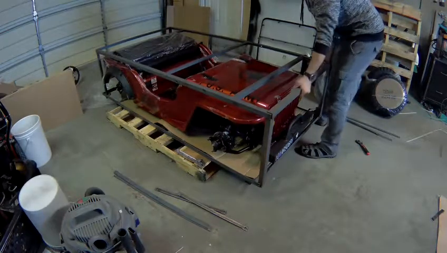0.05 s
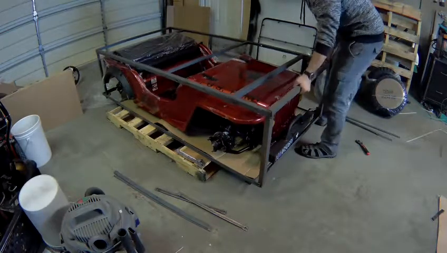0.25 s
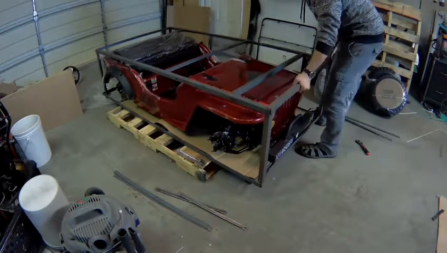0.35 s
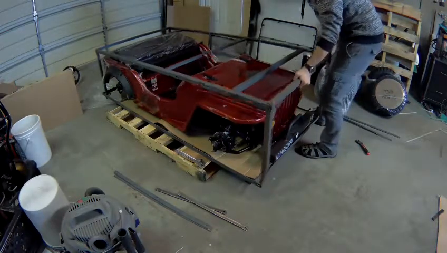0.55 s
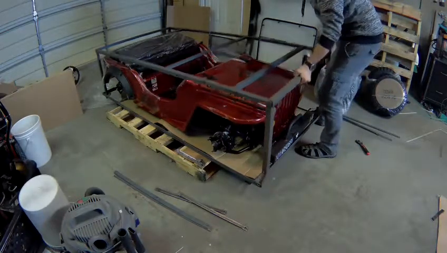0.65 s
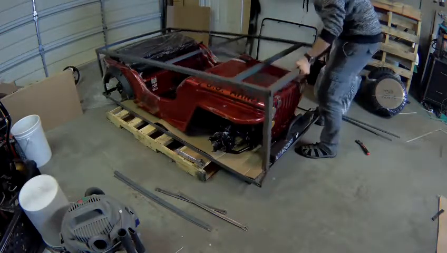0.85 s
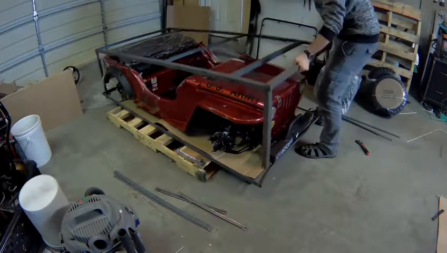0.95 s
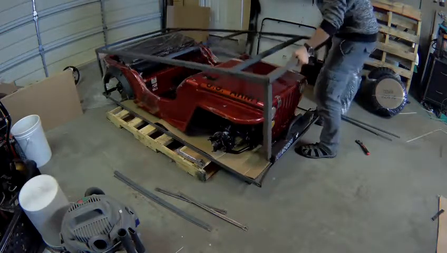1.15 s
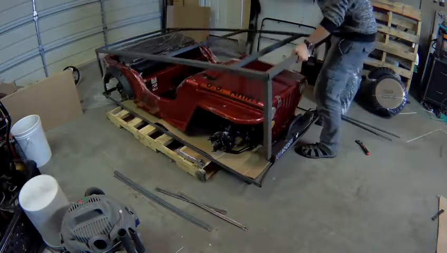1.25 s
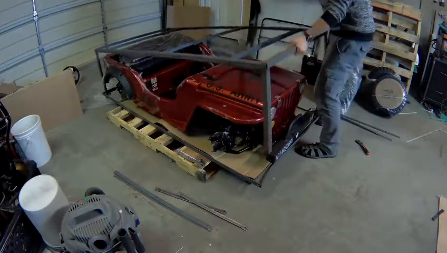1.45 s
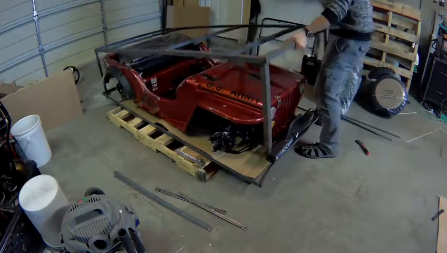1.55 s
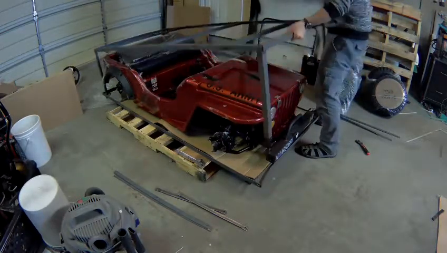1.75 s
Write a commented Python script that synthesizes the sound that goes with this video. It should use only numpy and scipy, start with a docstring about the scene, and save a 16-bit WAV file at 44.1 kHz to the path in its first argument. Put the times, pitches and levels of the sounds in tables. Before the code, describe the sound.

A steel tube frame scrapes over a small vehicle body, slips free with a bright clank, then scrapes again. Two hollow knocks follow, each ringing briefly in a quiet workshop, over a faint rustle of sleeves.

```python
"""In a quiet, hard-walled workshop, a welded steel tube frame is worked loose and lifted off a small
vehicle body. Stick-slip friction drives shell, panels and tubes in two scrapes. Between them the frame
slips free with a bright clank; a tiny tick follows. Two knocks then excite the low modes of the hollow
body. Every contact rings on in metal and room, over a faint rustle of sleeves."""
import sys
import numpy as np
from scipy import signal
from scipy.fft import rfft, irfft
from scipy.io import wavfile

SR = 44100
rng = np.random.default_rng(int(sys.argv[2]) if len(sys.argv) > 2 else 0)


def unload_wav(signal):
    """Save mono or channel-first audio to the path in sys.argv[1] as 16-bit WAV at rate SR, clipped to [-1, 1]."""
    wavfile.write(
        sys.argv[1],
        SR,
        np.round(np.clip(np.atleast_2d(signal).T, -1, 1) * 32767).astype(np.int16),
    )


N = 79380
T = np.arange(N) / SR
HZ = np.maximum(np.fft.rfftfreq(N, 1 / SR), 1)

# Spectra. Each row: frequency in Hz, relative spectral density in dB.
ROOM_TONE_SPECTRUM = [(20, 3.5), (60, 3), (120, -0.5), (350, -1.5), (700, -5), (1500, -11), (3000, -22),
                      (7000, -25), (13000, -27), (16000, -29)]
CLOTH_SPECTRUM = [(1000, 4.5), (2000, 1.5), (4000, 3), (6000, -1.5), (9000, -7), (13000, -5), (16000, -16)]
TICK_SPECTRUM = [(4000, -23), (7500, 0), (9000, 2), (11500, 3.5), (12900, 12), (14300, -9), (16000, -21)]
RUMBLE_SPECTRUM = [(20, -18), (45, -11), (80, -9), (120, -7), (175, -6), (235, -0.5), (300, 2), (390, -2),
                   (500, 0.5), (800, -27), (3000, -75)]
GRIND_SPECTRUM = [(200, -35), (400, -15), (500, -3.5), (620, 2), (700, -1), (800, 2), (980, -4),
                  (1100, -3.5), (1250, -3.5), (1900, -10), (2800, -37), (6000, -41.5)]
RASP_SPECTRUM = [(400, -42), (1000, -1), (1900, -0.5), (2900, -7.5), (3900, 4.5), (4900, -5.5), (6200, -5),
                 (8000, -18.5), (12800, -18.5), (16000, -46)]
CLANK_SPECTRUM = [(100, -23.5), (300, -8), (560, -0.5), (950, 4), (1120, -4), (1450, 2.5), (1900, -1),
                  (2900, -9), (3900, 3), (4600, -10), (6200, -12.5), (8000, -24), (13000, -30.5),
                  (16000, -58)]
THUD_SPECTRUM = [(40, -28), (90, -13), (130, -0.5), (195, -1), (250, -3), (340, 1.5), (520, -5.5),
                 (700, -8.5), (1200, -30), (3000, -39), (9000, -80)]
CLATTER_SPECTRUM = [(300, -19), (600, -1.5), (1050, 5.5), (1300, -4), (1550, -5.5), (1800, -8.5),
                    (2150, -19), (3000, -28), (4000, -23), (7000, -42), (15000, -66)]
# Normal modes. Each row: frequency in Hz, relative level in dB, 60 dB decay time in seconds.
RUBBED_PANEL_MODES = [(238.6, -6, .25), (281, -4.5, 0.22), (316, -11, 0.21), (498, -4, 0.32),
                      (600, 0.5, .25), (657, 2, 0.22), (790, -1, .25), (954, -3, .25)]
TUBE_MODES = [(806, -14, 0.59), (940, -10, 0.92), (1399, -3.5, 0.48), (1474, -1.5, 0.62), (1670, 2, 0.34),
              (1716, 2.5, 0.42), (2308, -9, .45), (2607, -6, 0.54), (3454, -7, 0.56), (3810, 3, 0.18),
              (3693, 2.5, 0.19), (3980, -1, 0.3), (4146, 2, 0.33), (5560, -3.5, 0.31)]
SHELL_MODES = [(192.7, 2, 0.43), (233, -18.5, 0.44), (308.4, 4, 0.55), (348.6, -2, 0.34), (374, -9, 0.2),
               (451.3, 5, 0.35), (485.5, -3, 0.56), (527.5, -3, 0.52), (600, -19, 0.58), (799, -19, 0.46),
               (1017, -5, 0.22), (1100, -26, 0.33), (1283, -7.5, 0.41), (1713, -9.5, 0.22)]
# Damping of room and metal together. Each row: frequency in Hz, 60 dB decay time in seconds.
DECAY_TIMES = [(100, 0.76), (300, 0.5), (800, 0.48), (1800, 0.58), (4000, 0.38), (7000, 0.38), (13000, 0.3)]
# Envelope of the sleeves' rustle. Each row: time in seconds, level in dB.
CLOTH_ENVELOPE = [(.2, -83), (.95, -65), (1.15, -77.5), (1.2, -64), (1.33, -64.5), (1.45, -64), (1.56, -68),
                  (1.66, -75.5), (1.72, -71), (1.8, -74)]
# One envelope per scrape. Each row: time in seconds, then levels of rumble, grind and rasp in dB.
SCRAPE_ENVELOPES = [
    [(.09, -70.5, -89, -91), (.165, -58, -57, -60.5), (.189, -43.5, -42.5, -41.5),
     (.225, -42, -41.5, -44.5), (.255, -41, -35.5, -49), (.29, -47, -48.5, -53), (.35, -49.5, -43.5, -50.5),
     (.41, -46, -49.5, -49.5), (.46, -67, -38.5, -74)],
    [(.5, -50, -76, -67), (.585, -50, -50.5, -53), (.675, -54, -47, -56), (.74, -61, -63, -87),
     (.77, -51.5, -51, -52), (.797, -70, -46.5, -57.5), (.815, -47.5, -37.5, -47.5),
     (.855, -45, -47, -47.5), (.89, -54, -57, -70), (1.03, -60, -66, -73), (1.09, -58.5, -61.5, -63.5),
     (1.15, -55.5, -70, -90)],
]
# Steel chattering on steel. Each row: start in seconds, level in dB.
CLANK_IMPACTS = [(.4405, -30), (.452, -33), (.464, -36), (.487, -35), (.514, -58)]
# Direct path and reflections off floor and walls. Each row: delay in seconds, relative level in dB.
THUMP_ARRIVALS = [(0, 1), (.0092, 5), (0.0174, -8), (0.0752, 2)]
# Blows on the body. Each row: start in seconds, gains in dB of thud with thump, of clatter and of ping,
# lower edge of the thud in Hz.
BODY_IMPACTS = [(1.1664, -36.5, -38, -90, 150), (1.3664, -37, -44, -58.5, 283)]


def from_db(db):
    """Amplitude ratio of a level in decibels."""
    return 10 ** (np.asarray(db) / 20)


def unit_rms(x):
    """Normalisation to unit mean power."""
    return x / np.sqrt(np.mean(x ** 2) + 1e-20)


def at_hz(table, hz):
    """Interpolation on a logarithmic frequency axis."""
    frequencies, values = np.transpose(table)
    return np.interp(np.log(hz), np.log(frequencies), values)


def noise(spectrum):
    """Random phases under a given spectrum make coloured noise of unit rms."""
    phases = np.exp(2j * np.pi * rng.random(len(HZ)))
    return unit_rms(irfft(phases * from_db(at_hz(spectrum, HZ)), N))


def decay(t60, hold_s=0):
    """Exponential decay after a hold: 60 dB in t60 seconds."""
    return np.exp(-np.log(1000) * np.maximum(T - hold_s, 0) / t60)


def rise(seconds):
    """Exponential growth to within a thousandth of one in the given time."""
    return 1 - decay(seconds)


def delay(x, seconds):
    """A pure time shift."""
    return np.concatenate([np.zeros(int(seconds * SR)), x])[:N]


def diffuse_tail(spectrum, hold_s=0):
    """Dense modes and reflections overlap into noise; each octave decays at its own rate."""
    grid_hz = np.arange(0, SR / 2, 50)
    ripple = np.interp(HZ, grid_hz, 2 * rng.random(len(grid_hz)) - 1)
    resonances_db = 5 * ripple * np.minimum(HZ / 3000, 1)  # crowded peaks, deepest in the treble
    field = rfft(unit_rms(irfft(rfft(noise(spectrum)) * from_db(resonances_db), N)))
    octaves_hz = np.geomspace(60, 15360, 9)
    bands = [np.interp(np.log(HZ), np.log(octaves_hz), row) for row in np.eye(len(octaves_hz))]
    return sum(irfft(field * band, N) * decay(at_hz(DECAY_TIMES, hz), hold_s)
               for band, hz in zip(bands, octaves_hz))


def ring(modes):
    """Free vibration is a sum of damped sinusoids, here of random phase and unit initial rms."""
    initial_rms = np.sqrt(sum(from_db(db) ** 2 for _, db, _ in modes) / 2)
    return sum(from_db(db) * np.sin(2 * np.pi * (hz * T + rng.random())) * decay(t60)
               for hz, db, t60 in modes) / initial_rms


def excite(force, response):
    """A linear system convolves the force with its impulse response, here of unit energy."""
    return signal.fftconvolve(force, unit_rms(response))[:N] / np.sqrt(N)


def room_tone():
    """Stationary noise, strongest in the bass, forms the ambient floor."""
    return from_db(-65) * noise(ROOM_TONE_SPECTRUM)


def sleeve_rustle():
    """Cloth friction gives broadband hiss under a slow envelope."""
    return from_db(np.interp(T, *np.transpose(CLOTH_ENVELOPE))) * noise(CLOTH_SPECTRUM)


def tick(start_s=.6215):
    """A tiny, very high transient is prolonged by reverberation."""
    snap = from_db(-41) * noise(TICK_SPECTRUM) * decay(.008)
    tail = from_db(-54) * diffuse_tail(TICK_SPECTRUM, hold_s=.02)
    return delay(snap + tail, start_s)


def scrapes(slips_per_s=1100, spread_db=3.5):
    """Stick-slip friction: dense, uneven impulses drive the shell, its panels and the tubes."""
    sizes = from_db(spread_db * np.minimum(rng.exponential(1, N), 4)) * rng.choice([-1, 1], N)
    slips = unit_rms(sizes * (rng.random(N) < slips_per_s / SR))
    envelopes = np.zeros((3, N))
    for times, *levels in map(np.transpose, SCRAPE_ENVELOPES):
        envelopes += from_db([np.interp(T, times, db, left=-200, right=-200) for db in levels])
    rumble, grind, rasp = slips * envelopes
    panel = diffuse_tail(GRIND_SPECTRUM) + from_db(-11) * ring(RUBBED_PANEL_MODES)
    tubes = diffuse_tail(RASP_SPECTRUM) + from_db(-10.5) * ring(TUBE_MODES)
    shell = diffuse_tail(RUMBLE_SPECTRUM)
    return excite(rumble, shell) + excite(grind, panel) + excite(rasp, tubes)


def clank():
    """Hard impacts are broadband: the freed frame chatters, and its tubes ring from the first blow."""
    chatter = sum(from_db(db) * delay(diffuse_tail(CLANK_SPECTRUM) * rise(.0044), start_s)
                  for start_s, db in CLANK_IMPACTS)
    strength = np.sqrt(sum(from_db(db) ** 2 for _, db in CLANK_IMPACTS))  # the blows add in energy
    tubes = strength * from_db(-.5) * ring(TUBE_MODES) * rise(.1)
    return chatter + delay(tubes, CLANK_IMPACTS[0][0])


def panel_thump(hz=343, t60=.047):
    """Multipath propagation: a panel's first few cycles arrive directly and by reflection."""
    pulse = np.sin(2 * np.pi * hz * T) * decay(t60) * rise(.005)
    return from_db(3.5) * sum(from_db(db) * delay(pulse, lag_s) for lag_s, db in THUMP_ARRIVALS)


def knocks(direct_share=.66, ping_hz=4800):
    """Impacts excite the hollow shell's modes; early reflections swell the clatter."""
    out = np.zeros(N)
    early_drop = from_db(-2.5 * (1.5 - decay(.033, hold_s=.079)))  # the early reflections end
    swell = 1 - (1 - direct_share) * decay(.065)
    for start_s, thud_db, clatter_db, ping_db, edge_hz in BODY_IMPACTS:
        shell = diffuse_tail(THUD_SPECTRUM, hold_s=.034) + from_db(4) * ring(SHELL_MODES)
        highpass = signal.butter(2, edge_hz, "high", fs=SR, output="sos")
        thud = signal.sosfilt(highpass, from_db(thud_db) * shell * rise(.025))
        clatter = from_db(clatter_db) * diffuse_tail(CLATTER_SPECTRUM, hold_s=.066) * swell * rise(.004)
        ping = from_db(ping_db) * ring([(ping_hz, 0, .31)]) * rise(.09)
        thump = from_db(thud_db) * panel_thump()
        out += delay(thump + (thud + clatter) * early_drop + ping, start_s)
    return out


def scene():
    """Superposition: contacts and background add in one channel."""
    return (scrapes() + clank() + tick() + knocks() + sleeve_rustle() + room_tone())[None]


def record(dry):
    """A steep zero-phase low-pass filter limits the bandwidth."""
    return signal.sosfiltfilt(signal.ellip(10, .05, 60, 15900, fs=SR, output="sos"), dry)


dry = scene()
out = record(dry)
unload_wav(out)
```